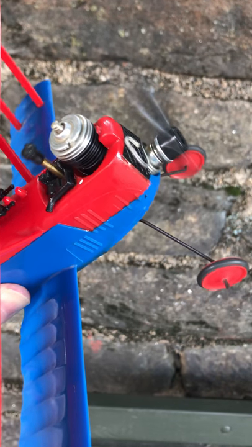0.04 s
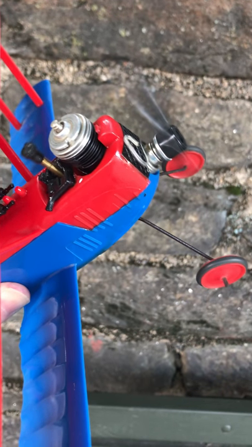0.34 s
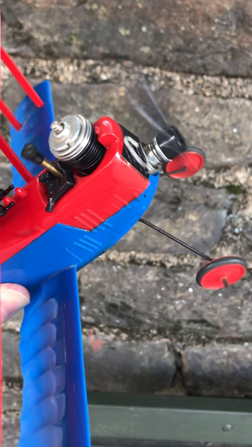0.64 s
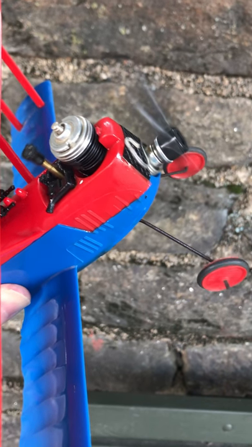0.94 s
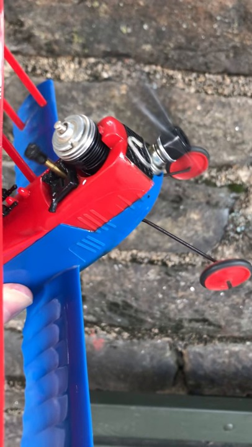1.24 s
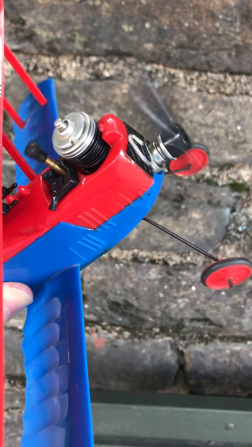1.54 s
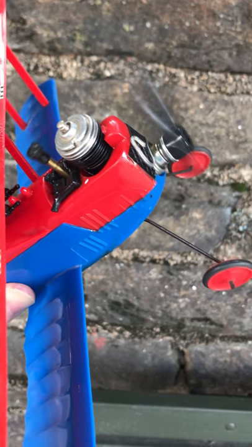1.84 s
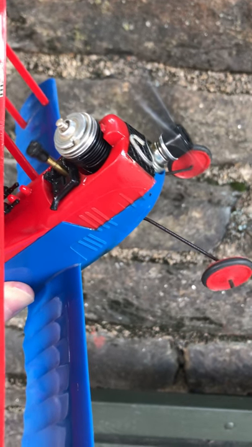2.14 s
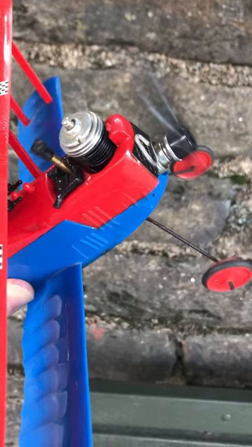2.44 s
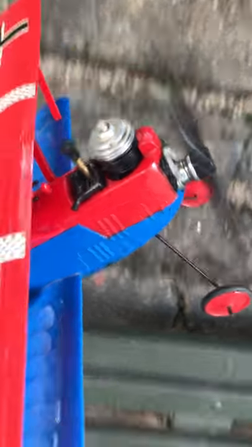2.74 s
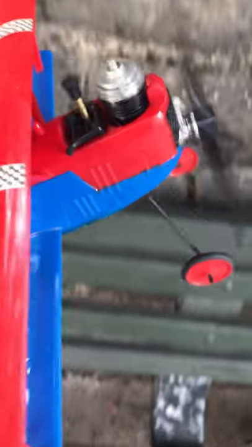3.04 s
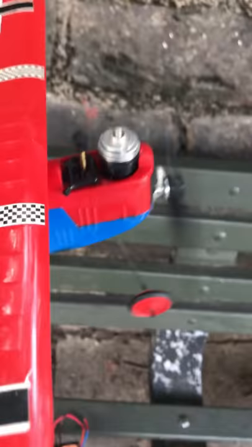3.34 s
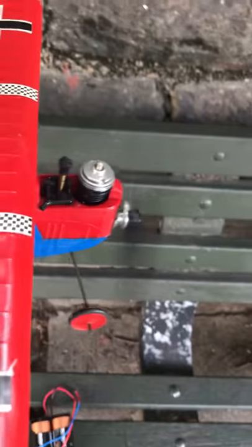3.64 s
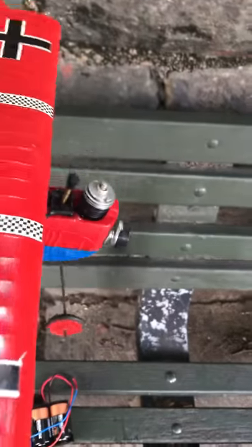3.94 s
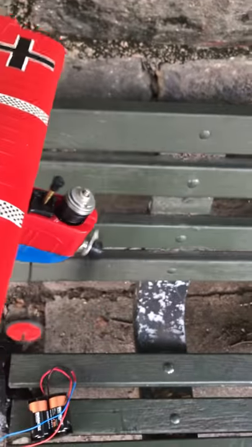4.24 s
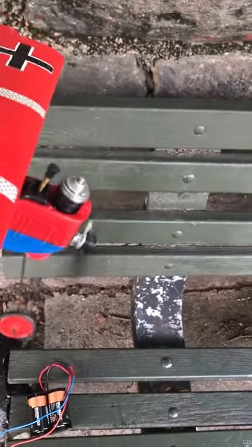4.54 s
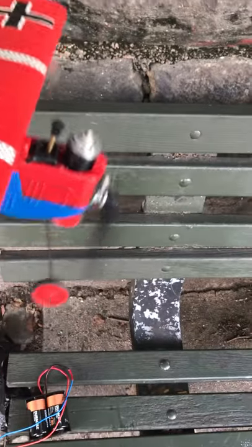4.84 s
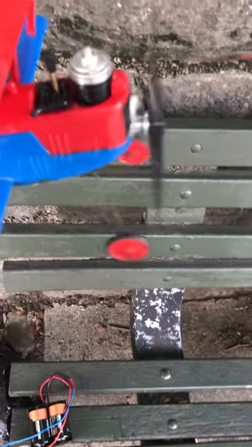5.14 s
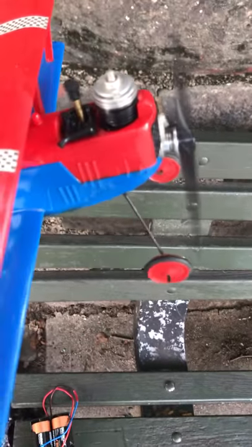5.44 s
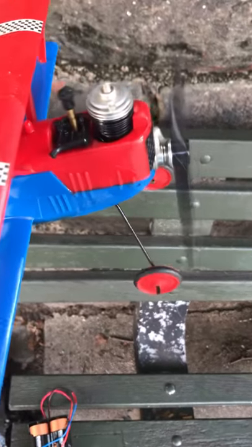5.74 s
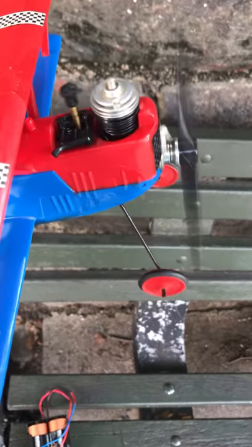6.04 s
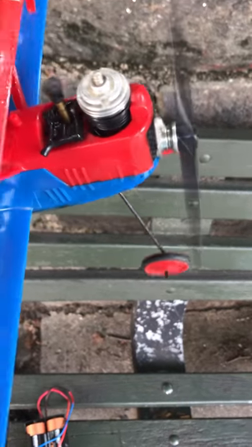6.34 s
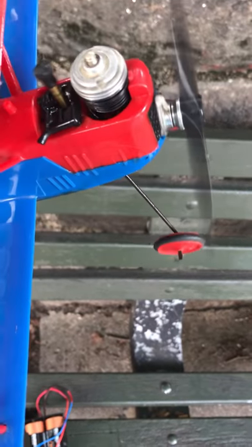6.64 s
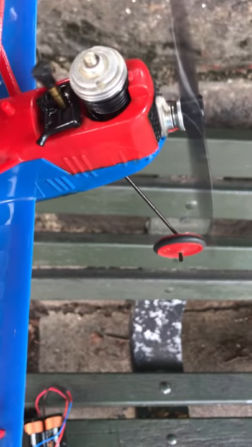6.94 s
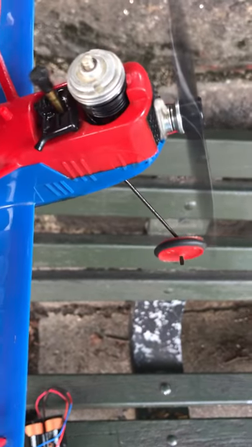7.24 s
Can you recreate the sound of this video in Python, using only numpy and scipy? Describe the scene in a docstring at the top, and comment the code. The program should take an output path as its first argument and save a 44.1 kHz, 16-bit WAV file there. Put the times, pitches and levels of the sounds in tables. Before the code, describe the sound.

A tiny two-stroke model plane engine runs flat out close by, a steady high, raspy buzz with brief misfires and a swirling tone.

```python
"""A tiny two-stroke glow engine runs flat out on a model plane held by hand over a bench, by a stone wall.
From the start it is heard over the cylinder head: each turn fires one sharp exhaust blast with a
little hiss, and now and then a firing fails, so the speed sags and recovers. From 2.5 s the plane is
turned and moved away, the tone swirls, and the propeller's wash on the microphone grows.
After 5 s the plane comes close, stumbles again near 6 s and runs on to the end."""
import sys
import numpy as np
from scipy import signal
from scipy.fft import rfft, irfft
from scipy.io import wavfile
from scipy.ndimage import uniform_filter1d, map_coordinates

SR = 44100
rng = np.random.default_rng(int(sys.argv[2]) if len(sys.argv) > 2 else 0)


def inscribe(sig):
    """Save sig as 16-bit PCM at rate SR to the path in sys.argv[1].

    A 1-D sig is mono; a 2-D sig holds one channel per row.
    Samples are clipped to [-1, 1] before scaling.
    """
    pcm = np.round(np.clip(np.atleast_2d(sig).T, -1, 1) * 32767)
    wavfile.write(sys.argv[1], SR, pcm.astype(np.int16))


N = 330750
FIRING_HZ = 257  # usual firing rate, the fundamental
# stumbles, in which every other firing is weak:
# t/s, level of the weak blasts/dB, number of them, extra force of the next firings/fraction
STUMBLES = [(.113, -2.5, 1, 0), (0.381, -3.5, 1, .05), (.945, -12, 2, 0.18), (1.112, -4.5, 1, 0.15),
            (2.828, -13, 1, .06), (3.212, -5, 1, .04), (3.337, -7, 2, 0), (3.629, -3.5, 1, .02),
            (4.3, -2, 1, 0.17), (4.448, -7.5, 3, .4), (5.526, -3, 1, 0.034), (5.91, -9.5, 2, 0.065),
            (5.964, -9, 2, 0.068)]


def engine(rush_db=-39, hiss_db=-29, hum_pumping=0.34, rasp_pumping=0.04, hum_lag_ms=1.0):
    """Source and filter: one blast a turn gives a harmonic series, heard as hum, bark, rasp and sizzle."""
    # how the plane is held: t/s, side (0 cylinder head, 1 tilted, 2 far, 3 beside, 4 close), motion (0-1)
    pose = [(0, -0.5, 0.29), (2.5, 0, 0), (2.7, 1.24, 0.55), (2.9, 2.66, 0.99), (3.2, 3, 0.89),
            (3.55, 3, 0.48), (3.95, 2.5, 0.19), (4.5, 2, 0.18), (4.96, 2.5, 0.34), (5.17, 3.5, 0.74),
            (5.7, 3.5, 0.17), (6.38, 3.5, 0.1)]
    # spectrum of the rushing noise: f/Hz, relative level/dB
    rush_spectrum = [(150, -2), (330, -1), (500, -3), (900, -3), (1300, 0.5), (1600, 0.5), (2400, 4.5),
                     (3150, -5), (4500, -23), (5700, 0), (6500, -15), (15000, -90.5)]
    side, motion = curves(pose)
    hz = crank_speed(motion)
    at, strength = firings(np.cumsum(hz) / SR)
    # faint steady hiss with a tick of random strength at each firing
    tick_envelope = firing_envelope(at, strength, decay_turns=0.0046, floor=0.067)
    hiss_and_ticks = unit(tick_envelope * rng.standard_normal(N))
    fired = exhaust(unit(clicks(at, strength)) + undb(hiss_db) * hiss_and_ticks, side)
    # the piston keeps pumping air through a misfire, so hum and rasp dip less than the bark
    pumped = exhaust(clicks(at, np.ones(len(at))), side)
    hum, _ = split(fired + hum_pumping * pumped, hz=680)
    hum = delay(hum, hum_lag_ms)
    below_rasp, _ = split(fired, hz=3047)
    _, bark = split(below_rasp, hz=487)
    bark = cavity(cavity(bark, hz=2424, width_hz=680), hz=945, width_hz=623)
    _, rasp = split(fired + rasp_pumping * pumped, hz=2984)
    rasp = rebound(rasp, share=0.52, lag_samples=66)
    rasp = reflections(rasp, motion, still_db=-16, moving_db=-10)
    edge = reflections(sizzle(at, strength, side), motion, still_db=-18, moving_db=-4)
    rush = undb(rush_db) * unit(tick_envelope * noise(rush_spectrum))
    bands = zip([hum, bark, rasp, edge], band_levels(side, hz))
    return rush + sum(undb(db) * steady(band) for band, db in bands)


def crank_speed(motion, wobble_hz=0.55, slosh_hz=0.55, misfire_cost_hz=7, spin_up_s=0.045):
    """Torque balance: lost firings slow the crank briefly; it flutters more as the hand shakes the fuel."""
    # rotation rate that the fuel mixture allows: t/s, f/Hz
    cruise = [(0.0, 253.2), (0.13, 257.2), (0.32, 255.7), (0.54, 257.5), (0.8, 254.6), (1.59, 258.6),
              (1.72, 263.8), (1.99, 255.3), (2.41, 261.4), (2.63, 257.6), (3.09, 258.5), (4.39, 259),
              (4.8, 258.4), (5.75, 256.6), (6.39, 253.9), (6.47, 256.9), (6.92, 254.5), (7.07, 257.7),
              (7.5, 254.5)]
    # spells in which the engine labours: t/s, rate lost/Hz, half length/s
    sags = [(0.39, 3.1, 0.042), (0.75, 2.8, 0.055), (1.13, 2.8, 0.026), (1.47, 7.3, 0.039),
            (1.89, 2.6, 0.03), (2.06, 5, 0.027), (2.52, 3.9, 0.037), (2.75, 3.02, 0.021), (2.9, 3.8, 0.022),
            (3.52, 1.6, 0.018), (3.79, 2.1, 0.027), (5.07, 3, 0.043), (5.16, 3.98, 0.035),
            (5.35, 1.74, 0.026), (5.59, 6.0, 0.038), (7.31, 2.9, 0.056)]
    t = np.arange(N) / SR
    hz, = curves(cruise)
    for s, weak_db, misses, _ in STUMBLES:
        lost_hz = misfire_cost_hz * (1 - undb(weak_db))
        for missed_s in s + 2 * np.arange(round(misses)) / FIRING_HZ:
            hz = hz - lost_hz * (t > missed_s) * np.exp(-abs(t - missed_s) / spin_up_s)
    return hz - bumps(sags) + (wobble_hz + slosh_hz * motion) * wander(rate_hz=56)


def firings(turns, jitter_s=1.8e-6, drift_s=2.5e-6, scatter_db=0.5, weak_late_s=8e-5, surge_s=0.053):
    """Cyclic variation: no two burns are alike. Gives the sample position and strength of each blast."""
    at = np.interp(np.arange(1, int(turns[-1])), turns, np.arange(N))
    jitter, drift, scatter = rng.standard_normal((len(at), 3)).T
    at = at + SR * (jitter_s * jitter + drift_s * np.cumsum(drift))
    burn = np.ones(len(at))
    for s, weak_db, misses, surge in STUMBLES:
        k = np.argmin(abs(at - s * SR))
        # unburnt fuel makes the next few firings harder
        burn[k:] += surge * np.exp(-(at[k:] - at[k]) / SR / surge_s)
        burn[k:k + 2 * round(misses):2] = undb(weak_db)
    # a weak burn leaves little pressure, so its blast gets out late
    return at + SR * weak_late_s * (1 - burn), burn * undb(scatter_db * scatter)


def exhaust(blasts, side):
    """Forced resonance: the blasts ring port, cowl and wing, which radiate a different tone to each side."""
    # response towards each of the five sides: f/FIRING_HZ, relative level/dB
    head_on = [(1, -8.5), (2, -15.5), (3, -8.5), (4, -7), (5, -8), (6, -11.5), (7, -6.5), (8, 1.5), (9, -8),
               (10, 4), (11, -7.5), (12, -27), (13, -8.5), (14, -10.5), (15, -8), (16, -6), (17, -12),
               (18, -3), (19, -10), (20, -10.5), (21, -16.5), (22, -16.5), (23, -16.5), (24, -30)]
    tilted = [(1, -1.5), (2, -8), (3, -2), (4, 2), (5, -2), (6, 3.5), (7, -21), (8, 8.5), (9, -7),
              (10, 12.5), (11, -11), (12, -12.5), (13, -6), (14, -4.5), (15, -5), (16, -6), (17, -5),
              (18, 2.5), (19, -6), (20, -28), (21, -4.5), (22, -39), (23, -12), (24, -21)]
    far = [(1, -0.5), (2, -8.5), (3, 4.5), (4, 2), (5, 5.5), (6, -14), (7, 6.5), (8, 1.5), (9, 11),
           (10, -4), (11, 10.5), (12, -30), (13, -5.5), (14, -23), (15, 0), (16, -10.5), (17, -2), (18, 5),
           (19, -13), (20, -4.5), (21, -30.5), (22, -13.5), (23, -17.5), (24, -19)]
    beside = [(1, -2.5), (2, -14), (3, -7.5), (4, -5.5), (5, -4.5), (6, -16), (7, -10), (8, -10.5),
              (9, -11.5), (10, 2.5), (11, -3.5), (12, -28), (13, -13), (14, -4.5), (15, -16.5), (16, -4.5),
              (17, -9.5), (18, -6), (19, -6), (20, -10.5), (21, -13.5), (22, -20.5), (23, -20), (24, -27.5)]
    close = [(1, -5.5), (2, -10.5), (3, -6.5), (4, -1.5), (5, -3.5), (6, -12.5), (7, -1.5), (8, -0.5),
             (9, 2), (10, 1), (11, 6), (12, -15), (13, -11.5), (14, -1), (15, -8), (16, 1), (17, -6.5),
             (18, 0), (19, 1), (20, -17), (21, -9.5), (22, -16), (23, -7.5), (24, -17.5)]
    out = 0
    for k, tone in enumerate([head_on, tilted, far, beside, close]):
        harmonics = [(multiple * FIRING_HZ, db) for multiple, db in tone]
        outline = [(60, -27.5)] + harmonics + [(6600, -43)]
        weight = np.clip(1 - abs(side - k), 0, 1)
        out = out + weight * unit(ring(blasts, outline))
    return out


def sizzle(at, strength, side, hiss_db=-11.5, scatter_db=0.5):
    """Impulse excitation: steep blast fronts rattle the airframe and ring the head; the port hisses."""
    # narrow metallic modes heard over the cylinder head: f/Hz, bandwidth/Hz, relative level/dB
    head_modes = [(7410, 320, 1), (7900, 280, -3), (8480, 160, 2.5), (9490, 600, 0), (10970, 250, -0.5),
                  (11800, 250, -2.5), (12870, 110, -3.5), (13200, 180, -2.5), (14200, 600, -33)]
    # spectrum of the blast's edge, from further off and from close by: f/Hz, relative level/dB
    away_spectrum = [(6200, -41), (6600, 0.5), (7300, 0), (8400, -1), (9500, -0.5), (10400, -7),
                     (11400, -3.5), (13000, -6.5), (14200, -16), (15700, -15.5)]
    close_spectrum = [(6200, -49), (6600, -7), (7300, 4.5), (8300, -13.5), (9400, 0), (10400, -12),
                      (11000, -3.5), (13000, -4.5), (14200, -11), (15700, -19)]
    front = clicks(at, strength * undb(scatter_db * rng.standard_normal(len(at))))
    port_hiss = firing_envelope(at, strength, decay_turns=0.22, floor=0.14) * rng.standard_normal(N)
    rattle = rebound(rebound(front, share=0.8, lag_samples=69), share=0.72, lag_samples=17)
    edge = unit(rattle) + undb(hiss_db) * unit(port_hiss)
    modes = sum(undb(db) * signal.lfilter(*signal.iirpeak(hz, hz / width_hz, fs=SR), edge)
                for hz, width_hz, db in head_modes)
    _, head = split(modes, hz=6060)
    above, close = np.clip(1 - side, 0, 1), np.clip(side - 3, 0, 1)
    return (above * unit(head)
            + (1 - above - close) * unit(ring(edge, away_spectrum))
            + close * unit(ring(edge, close_spectrum)))


def firing_envelope(at, strength, decay_turns, floor):
    """Exponential decay: an envelope that jumps at each firing and falls to a steady floor."""
    turns = np.interp(np.arange(N), at, np.arange(len(at)))
    return floor + np.exp(-(turns % 1) / decay_turns) * strength[turns.astype(int)]


def band_levels(side, hz, rasp_db_per_hz=0.03, sizzle_db_per_hz=0.2):
    """Directivity and distance set the level of each band in dB; a faster engine has more edge."""
    # one row for each side, 0 to 4: hum level/dB, bark level/dB, rasp level/dB, sizzle level/dB
    directivity = [(-26, -13.5, -19.5, -37), (-26.5, -13.5, -19.5, -38), (-23.5, -16, -18.5, -35.5),
                   (-24.5, -15.5, -19, -35.5), (-23.6, -14.5, -19, -34.5)]
    # swell of the engine as the hand carries it about: t/s, level/dB
    nearness = [(2.7, -0.5), (3.35, 0), (3.55, -0.9), (3.8, 0), (4.3, -0.5), (4.5, -0.1), (4.85, -0.3),
                (5.3, 2), (5.9, -0.25), (6.4, 1), (6.9, 0.3)]
    near_db, = curves(nearness)
    hum, bark, rasp, edge = (np.interp(side, np.arange(len(db)), db) + near_db
                             for db in np.transpose(directivity))
    excess_hz = hz - FIRING_HZ
    return hum, bark, rasp + rasp_db_per_hz * excess_hz, edge + sizzle_db_per_hz * excess_hz


def cavity(x, hz, width_hz):
    """Group delay: a cavity holds back tones near its resonance, spreading a blast into a few swings."""
    _, denominator = signal.iirpeak(hz, hz / width_hz, fs=SR)
    return signal.lfilter(denominator[::-1], denominator, x)


def rebound(x, share, lag_samples):
    """Multiple reflection, as an all-pass comb: a share comes at once, the rest rounds the airframe."""
    taps = np.r_[share, np.zeros(lag_samples - 1), 1]
    return signal.lfilter(taps, taps[::-1], x)


def reflections(x, motion, still_db, moving_db, sweep_ms=0.3604, count=4):
    """Comb interference: echoes off wing, bench and wall swirl the tone as the hand shifts their paths."""
    travel = np.cumsum(motion) / SR
    gain = undb(still_db) + undb(moving_db) * motion
    out = x
    for ms, pace, phase in rng.uniform([1, 2.5, 0], [3.4, 6, 2 * np.pi], (count, 3)):
        out = out + gain * delay(x, ms + sweep_ms * np.sin(pace * travel + phase))
    return out


def propeller_wash(gust_half_s=0.045):
    """Turbulent pressure: the propeller's slipstream rumbles softly on the microphone, with a few gusts."""
    # spectrum of the rumble: f/Hz, relative level/dB
    spectrum = [(20, -55), (40, -14), (53, -13), (60, 2.5), (68, 0), (85, -8.5), (100, -3.5), (130, -5.5),
                (170, -16), (230, -12.5), (400, -27), (900, -60)]
    # strength of the slipstream at the microphone: t/s, level/dB
    slipstream = [(2.4, -47.5), (5, -38.5), (7.5, -41)]
    # gusts that hit squarely: t/s, level above the slipstream/dB
    gusts = [(1.0, 7), (2.83, 10), (4.97, 5), (5.63, 3), (6.65, 5)]
    stream_db, = curves(slipstream)
    gust_db = bumps((s, db, gust_half_s) for s, db in gusts)
    return undb(stream_db + gust_db) * noise(spectrum)


def ring(x, points, size=2048):
    """Minimum-phase filtering: a causal resonator with the outline (f/Hz, level/dB)."""
    hz, db = np.transpose(points)
    bin_hz = np.arange(size // 2 + 1) * SR / size
    outline_db = np.interp(np.log(bin_hz + 1), np.log(hz), db)
    cepstrum = irfft(np.log(undb(outline_db)))[:size // 2]
    cepstrum[1:] *= 2
    impulse_response = irfft(np.exp(rfft(cepstrum, size)))
    return signal.fftconvolve(x, impulse_response)[:N]


def clicks(at, gain, size=8):
    """Band-limited impulses: windowed sincs at fractional sample positions."""
    taps = at.astype(int)[:, None] + np.arange(1 - size, size + 1)
    offset = taps - at[:, None]
    shape = np.sinc(offset) * np.sinc(offset / size)
    return np.bincount(np.clip(taps, 0, N - 1).ravel(), (gain[:, None] * shape).ravel(), N)


def split(x, hz, order=6):
    """Complementary filtering: the low-passed part of x and the remainder."""
    low = signal.sosfiltfilt(signal.butter(order, hz, fs=SR, output="sos"), x)
    return low, x - low


def delay(x, ms):
    """Fractional delay by a constant or moving time."""
    return map_coordinates(x, [np.arange(N) - ms * SR / 1000], order=3)


def noise(points):
    """Spectral shaping: noise of rms 1 with the outline (f/Hz, level/dB)."""
    return unit(ring(rng.standard_normal(N), points, size=16384))


def wander(rate_hz):
    """Smoothed random steps with a spread near 1."""
    hold = int(SR / rate_hz)
    steps = np.repeat(rng.standard_normal(N // hold + 1), hold)
    return unit(uniform_filter1d(uniform_filter1d(steps, hold), hold))[:N]


def bumps(rows):
    """Superposed bell curves from rows of (t/s, height, half length/s)."""
    t = np.arange(N) / SR
    return sum(height * np.exp(-((t - s) / half_s) ** 2) for s, height, half_s in rows)


def curves(table):
    """Linear interpolation of each column against the first, t/s, at every sample."""
    s, *columns = np.transpose(table)
    return [np.interp(np.arange(N) / SR, s, column) for column in columns]


def steady(x, size=15000):
    """Normalisation to a running rms of 1, leaving quick dips alone."""
    return x / np.sqrt(uniform_filter1d(x ** 2, size))


def unit(x):
    """Normalisation to rms 1."""
    return x / np.std(x)


def undb(db):
    """Amplitude ratio of a level in decibels."""
    return 10 ** (np.asarray(db) / 20)


def scene():
    """Superposition of engine and propeller wash, in one channel."""
    return (engine() + propeller_wash())[None]


def record(dry, top_hz=15700):
    """Band limiting: a steep low-pass cuts the highest treble."""
    return signal.sosfilt(signal.ellip(10, .1, 80, top_hz, fs=SR, output="sos"), dry)


dry = scene()
out = record(dry)
inscribe(out)
```